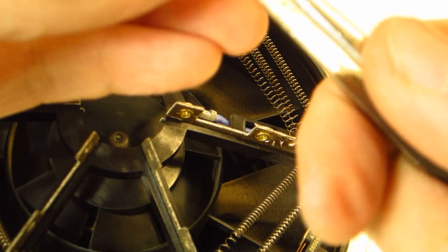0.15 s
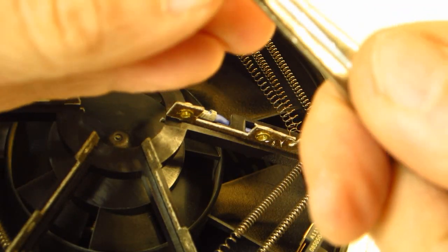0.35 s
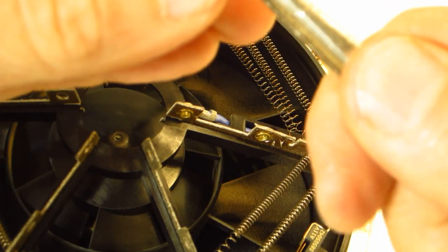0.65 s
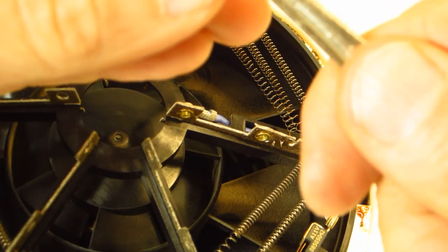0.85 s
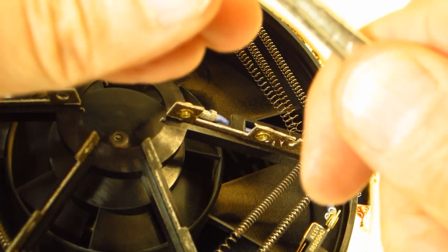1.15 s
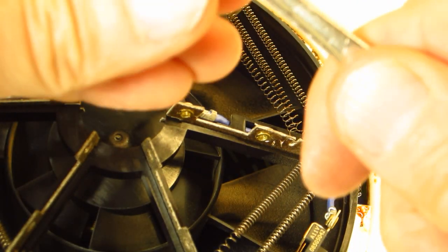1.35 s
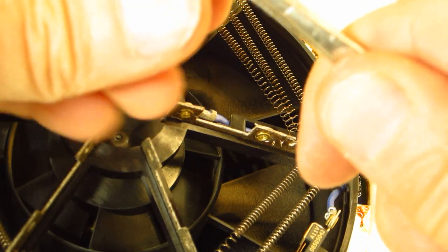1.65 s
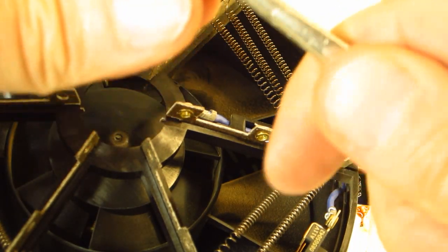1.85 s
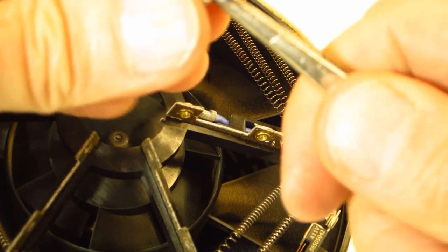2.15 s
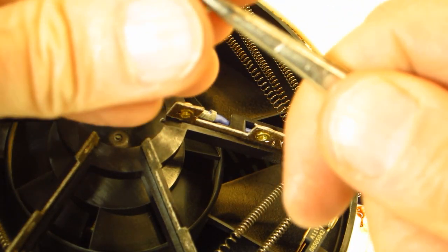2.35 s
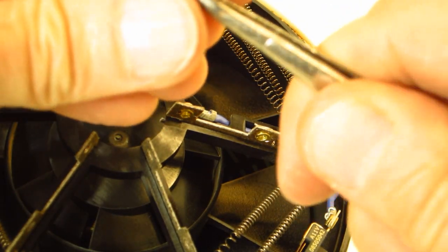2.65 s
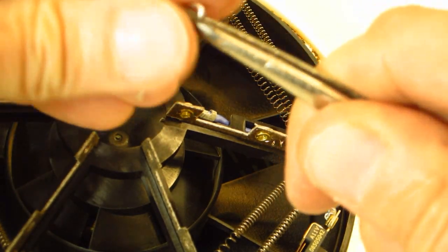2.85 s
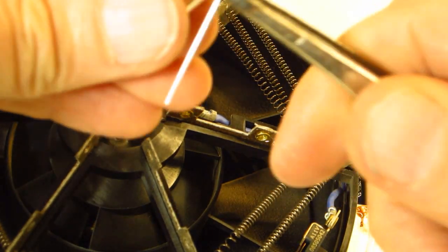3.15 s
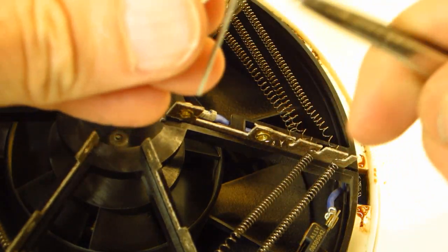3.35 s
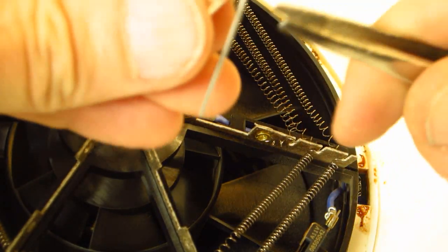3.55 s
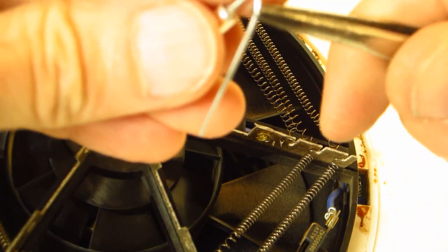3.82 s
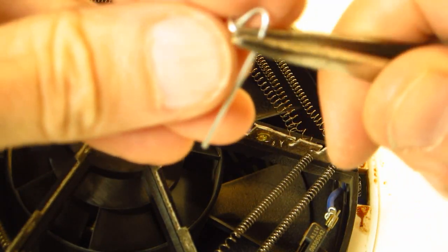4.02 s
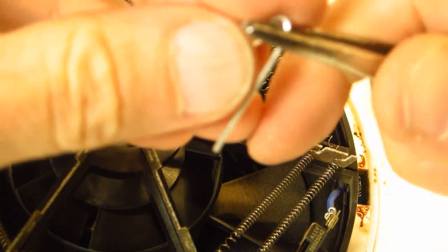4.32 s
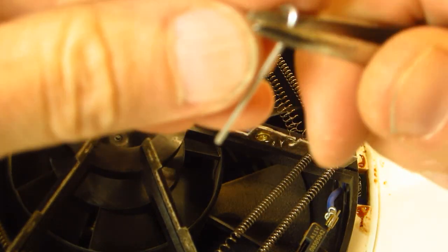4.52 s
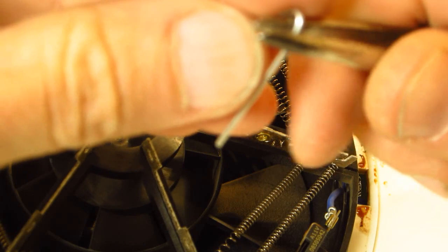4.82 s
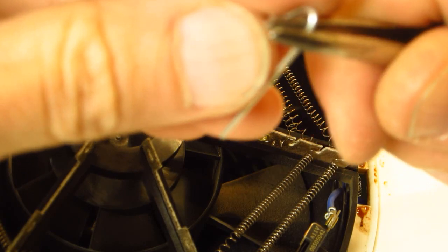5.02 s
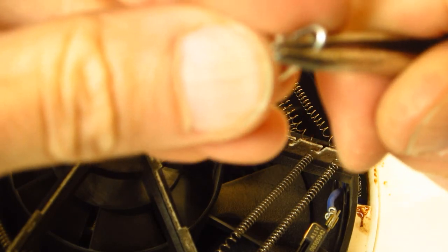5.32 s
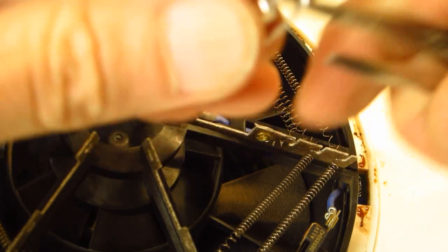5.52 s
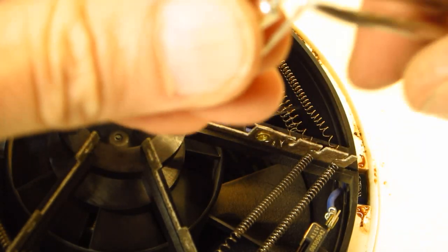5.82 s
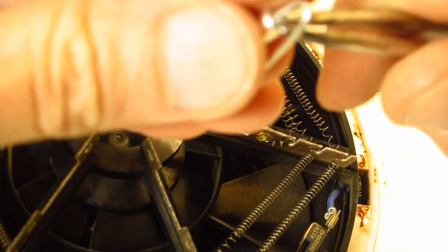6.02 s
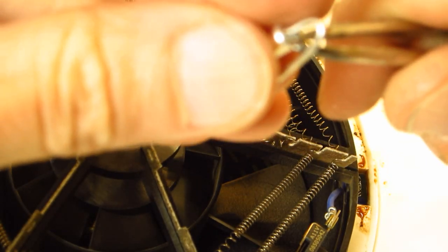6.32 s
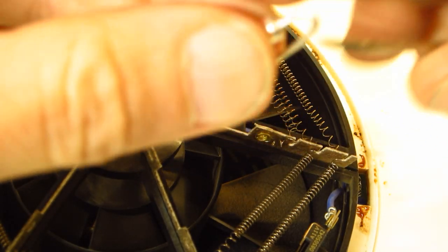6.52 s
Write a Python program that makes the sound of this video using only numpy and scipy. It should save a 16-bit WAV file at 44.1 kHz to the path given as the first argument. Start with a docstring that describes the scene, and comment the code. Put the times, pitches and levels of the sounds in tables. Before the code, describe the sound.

Small pliers click and scrape on a thin metal wire close up, with faint finger rubbing, plastic knocks and soft ticking in a quiet hissy room.

```python
"""Pliers bending a wire

Small pliers grip and bend a wire lead held in the fingers over an open appliance, close to a mono microphone.
The jaws click and scrape: steel and wire ring briefly, damped by the fingers. The hands rub the plastic housing
with coloured noise and knock it with short cracks and notes. Something, probably a clock, ticks softly once a
second as swells of noise. Hiss, hum, rumble and a thin whine fill the quiet room."""
import sys
import numpy as np
from scipy import signal
from scipy.fft import rfft, irfft
from scipy.io import wavfile
from scipy.ndimage import uniform_filter1d

SR = 44100
rng = np.random.default_rng(int(sys.argv[2]) if len(sys.argv) > 2 else 0)


def to_wav(s):
    """Save 16-bit WAV."""
    ch = np.atleast_2d(s).T  # columns
    pcm = np.round(np.clip(ch, -1, 1) * 32767)  # PCM
    wavfile.write(sys.argv[1], SR, pcm.astype(np.int16))


N = 294147
T = np.arange(N) / SR  # time of every sample, s
TOP_HZ = 15900  # nothing is heard above this

# still air of the room and microphone hiss: f/Hz, level/dB
AIR_SPECTRUM = [(44, -43), (75, 0.5), (161, 1.5), (192, -0.5), (252, -1.5), (276, -1.5), (308, -2.5),
                (369, -3.5), (441, -4.5), (676, -7.5), (1300, -9), (3040, -15.5), (3810, -15),
                (13400, -22.5), (16000, -35)]
# fingers shifting their grip: start/s, length/s, housing level/dB, skin hiss level/dB
GRIP_SHIFTS = [(3.097, 0.15, -62.5, -56.5), (3.198, 0.2, -58, -57.5), (3.389, 0.26, -58, -75),
               (3.745, 0.13, -63.5, -72), (4.364, 0.24, -65, -66.5), (5.182, 0.073, -65, -63.5),
               (5.295, 0.04, -77, -62), (5.435, 0.15, -50.5, -57), (6.428, 0.14, -59.5, -63.5)]
# tone of skin rubbing on plastic: f/Hz, level/dB
SKIN_SPECTRUM = [(500, -16), (1500, 1.5), (4000, -1.5), (8000, -3.5), (12000, -16), (16000, -18)]
# ringing modes of the hollow plastic housing: f/Hz, width/Hz, level/dB
HOUSING_MODES = [(461, 53, 6.5), (563, 70, 2.5), (848, 130, -0.5), (1045, 200, -6.5), (1330, 36, 7.5),
                 (2120, 55, 3), (2520, 110, -17), (2980, 100, -1.5), (3480, 180, -3.5), (4520, 65, 2.5),
                 (6850, 380, 3), (7350, 150, -24.5)]
# jaws snapping on the wire: t/s, level/dB, bass/dB and treble/dB (both against the 5 kHz region),
# pitch of the free wire f/Hz, gap to the rebound/s
JAW_CLICKS = [(0.0175, -34.5, -14, -12.5, 6100, 0.00075), (0.32, -55, 12, -22.0, 5640.0, 0.00032),
              (0.3436, -21.5, -9.5, -9.5, 4470, 0.00077), (0.5255, -19.0, -3.5, -9, 4650, 0.00049),
              (1.8786, -31.5, 10.5, -8.5, 2680, 0.00014), (1.9619, -38.5, 7, -3.5, 8000, 0.0007),
              (2.011, -36.0, 5, -17, 6200, 0.00042), (2.343, -50.0, 15, -4, 7460.0, 0.00065),
              (2.8953, -42.5, 10, -5.5, 7460, 0.00059), (2.927, -28.5, 9, -0.5, 4120.0, 0.00086),
              (3.1195, -49.5, 0.0, -1, 8000.0, 0.00043), (3.8585, -28.5, -7.5, -8, 4620, 0.0003),
              (3.8806, -28.0, -0.5, -6.5, 3290.0, 0.00025), (3.9102, -43.0, 10.0, -6.0, 2340, 0.00057),
              (3.9972, -42.0, -3, -3, 3800, 0.00034), (4.0712, -38.5, -3.5, -2, 8050, 0.00043),
              (4.1996, -43.5, -7, -6, 6270.0, 0.00068), (4.216, -43, -1, -2.5, 6100, 0.00068),
              (4.33, -37.0, -8.5, -10, 5300, 0.00046), (4.3405, -43.0, -7, -12.0, 3500, 0.00075),
              (4.371, -47.5, -5, -22.0, 3750, 0.00024), (4.4023, -42.0, -3, -20, 3700, 0.00064),
              (4.4986, -40.5, -3, -6.0, 3720, 0.0007), (5.5099, -44, 4.0, -15, 4050.0, 0.00025),
              (5.5213, -15, -6.0, -2.0, 4190.0, 0.00028), (5.5386, -29.5, 5, 4, 3520.0, 0.00052),
              (5.8838, -42.5, -7, -1.0, 4190.0, 0.00037), (5.912, -47, 15, 0.0, 5260.0, 0.00014),
              (5.9562, -41.5, -4, -1, 7460.0, 0.00034), (5.9936, -34.0, -18, -8, 6840.0, 0.00036),
              (6.4398, -22.5, -4, 3, 8200, 0.00016)]
# partials of the free wire: ratio to its pitch
WIRE_PARTIALS = [1, 1.9, 2.89]
# modes of pliers and wire, damped by the fingers: f/Hz, time to fall 60 dB/s,
# level/dB (before shorter rings are boosted and the contact adds its colour)
STEEL_MODES = [(1220, 0.014, -15.5), (2693, 0.0087, -2), (3117, 0.0079, -2.5), (3840, 0.0033, -1),
               (4510, 0.006, 0.5), (5430, 0.0057, 1), (6270, 0.0037, 2.5), (7060, 0.0096, -0.5),
               (7850, 0.0031, 6), (9390, 0.0043, 1), (10190, 0.0061, 3.5), (11380, 0.0076, 3.5),
               (13200, 0.0037, 4.5), (14800, 0.008, -4)]
# where a contact sets its bass, middle, treble and very top: f/Hz
CONTACT_REGIONS = [2700, 5000, 8700, 13000]
# jaws sliding along the wire: t/s, length/s, level/dB, treble/dB, strongest ring f/Hz
JAW_SCRAPES = [(0.287, 0.0058, -49.5, -10, 5630), (0.304, 0.009, -55, -10, 5240),
               (1.295, 0.043, -59, 1, 2740), (1.961, 0.021, -50.5, -4, 5600),
               (3.234, 0.0083, -41, -4, 5910), (3.213, 0.15, -63, 6, 5860), (3.867, 0.015, -47, -6, 4600),
               (3.999, 0.021, -52, -9, 8470), (4.183, 0.052, -61, 0, 6000), (4.614, 0.0038, -53, -12, 5900),
               (5.542, 0.016, -48, -3, 7600), (5.555, 0.024, -36.5, -1.5, 7830),
               (5.905, 0.032, -47, 0.5, 5900), (6.025, 0.022, -57.5, -6, 5250),
               (6.434, 0.0066, -27, 0.5, 7670), (6.442, 0.014, -45.5, -4, 12500)]
# tone of the distant tick: f/Hz, level/dB
TICK_SPECTRUM = [(400, -12), (850, -3), (1700, -3), (2400, 0), (3300, -2), (4500, -5.5), (6100, -5.5),
                 (7300, -14), (12000, -29)]
# bumps on the housing: t/s, force as level/dB (crack and note are set from it),
# treble tilt/dB per octave, note of the spot that is hit f/Hz
HOUSING_KNOCKS = [(3.173, -47, 8, 1305), (3.380, -49, -4, 1760), (3.476, -54, -4, 556),
                  (3.5416, -24.5, 1.5, 880), (3.5793, -45.5, -3, 1540), (3.6024, -46.5, 0, 656),
                  (3.619, -38.5, 1.5, 3120), (3.675, -55, 3, 820), (5.207, -54, 2, 1980),
                  (6.437, -45.5, -0.5, 1480)]
# tone of the crack of a bump, before its tilt: f/Hz, level/dB
KNOCK_SPECTRUM = [(120, -38), (220, -20), (400, -14), (530, -21), (700, -27), (850, -8), (990, -9),
                  (1150, -5.5), (1450, -16.5), (2400, -10.5), (4200, -16.5), (7400, -18), (9000, -25),
                  (12000, -30), (15000, -53)]
# tone of the faint tail of the room: f/Hz, level/dB
ROOM_SPECTRUM = [(500, -3), (2000, -23), (3500, -3), (5500, 2), (8500, -4), (10500, -6), (15000, -21)]


def undb(db):
    """Turn decibels into a gain."""
    return 10 ** (np.asarray(db) / 20)


def unit(x):
    """Scale a sound to an average (rms) level of 1."""
    return x / np.sqrt(np.mean(x ** 2))


def decay(t, t60):
    """A natural dying-away: down by 60 dB after t60 seconds."""
    return np.exp(-np.log(1000) * t / t60)


def add(out, s, x):
    """Mix a short sound in at time s."""
    i = int(s * SR)
    out[i:i + len(x)] += x[:N - i]


def coloured(points, size, tilt_db=0):
    """Noise of rms 1 shaped by (f/Hz, level/dB) points and tilted by tilt_db per octave."""
    octave = np.log2(np.fft.rfftfreq(size, 1 / SR) + 1)
    hz, db = np.transpose(points)
    shape_db = np.interp(octave, np.log2(hz), db) + tilt_db * octave
    return unit(irfft(rfft(rng.standard_normal(size)) * undb(shape_db), size))


def resonate(x, hz, width):
    """One resonance, with gain 1 at its centre; a narrower one rings longer."""
    return signal.lfilter(*signal.iirpeak(hz, hz / width, fs=SR), x)


def background(hum_hz=40, air_db=-59, hum_db=-64.5, rumble_db=-65.5, whine_hz=7810, whine_db=-82):
    """Steady hiss, a low hum in a bed of rumble and a thin electronic whine made of narrow noise."""
    air = coloured(AIR_SPECTRUM, N)
    hum = np.sqrt(2) * np.sin(2 * np.pi * hum_hz * T)
    rumble = coloured([(8, -48), (25, -4.0), (42, 0.5), (60, -1.5), (100, -15.0), (400, -76.0)], N)
    whine = unit(resonate(rng.standard_normal(N), whine_hz, 45))
    return undb(air_db) * air + undb(hum_db) * hum + undb(rumble_db) * rumble + undb(whine_db) * whine


def housing(x):
    """The plastic shell answers a sound with a sum of its own resonances."""
    return sum(undb(db) * resonate(x, hz, width) for hz, width, db in HOUSING_MODES)


def stroke(start, length, attack_s=0.048, release_t60_s=0.12):
    """A shift of the grip: it builds up, holds and dies away."""
    rise = np.clip((T - start) / attack_s, 0, 1)
    return rise * decay(np.maximum(T - start - length, 0), release_t60_s)


def waver(db, length_s):
    """A gain that wanders by about db, each turn lasting about length_s."""
    wander = uniform_filter1d(rng.standard_normal(N), int(length_s * SR) + 1)
    return undb(db * unit(wander))


def rubbing(grain_db=1.5, grain_s=0.0037, catches_per_s=700, catch_db=5, crackle_db=-3,
            pressure_db=2.5, pressure_s=0.027, hold_db=-71.5):
    """Uneven friction of the fingers hisses, the skin catches in tiny ticks, and both stir the housing."""
    # hands that only hold still are never quite silent
    body_gain = hiss_gain = undb(hold_db)
    for start, length, body_db, hiss_db in GRIP_SHIFTS:
        move = stroke(start, length)
        body_gain = np.hypot(body_gain, undb(body_db) * move)
        hiss_gain = np.hypot(hiss_gain, undb(hiss_db) * move)
    grip = unit(waver(grain_db, grain_s) * waver(pressure_db, pressure_s))
    caught = rng.random(N) < catches_per_s / SR
    catches = caught * undb(catch_db * np.minimum(rng.exponential(size=N), 3))
    ticks = unit(signal.fftconvolve(catches, np.hanning(32))[:N])
    friction = unit(grip + undb(crackle_db) * ticks)
    push = coloured([(300, -16), (450, -5.0), (800, -5.0), (2500, -3.5), (8000, -26)], N)
    body = unit(housing(friction * push))
    hiss = friction * coloured(SKIN_SPECTRUM, N)
    return body * body_gain + hiss * hiss_gain


def steel(low_db, high_db, top_db, pitches, ring_db=7, ring_t60=0.0068,
          contact_s=0.00018, edge_hz=1500, phase_spread=0.32):
    """One slip of energy 1: the contact point weights the steel modes, the free wire stresses some pitches."""
    t = np.arange(1024) / SR
    hz, t60, db = np.transpose(STEEL_MODES)
    colour_db = np.interp(hz, CONTACT_REGIONS, [low_db, 0, high_db, top_db])
    gain = undb(db + colour_db) / np.sqrt(t60)
    # neighbouring modes of a bar swing roughly opposite ways
    phase = np.pi * np.arange(len(hz)) + phase_spread * rng.standard_normal(len(hz))
    modes = np.sin(2 * np.pi * np.outer(t, hz) + phase) * decay(t[:, None], t60)
    soft_start = 1 - np.exp(-(t / contact_s) ** 2)
    x = modes @ gain * soft_start
    ring_width = np.log(1000) / (np.pi * ring_t60)  # Hz
    x = x + undb(ring_db) * sum(resonate(x, pitch, ring_width) for pitch in pitches)
    x = signal.sosfilt(signal.butter(1, edge_hz, "high", fs=SR, output="sos"), x)
    return x / np.sqrt(np.sum(x ** 2))


def contact(db, bass_db, treble_db, pitches, top_slope=1.17, top_growth=0.28, top_offset_db=7, **ring):
    """One slip whose very top follows the treble, but faster, and gains top_growth dB per dB of force."""
    heard = [hz for hz in pitches if hz < TOP_HZ]
    top_db = top_slope * treble_db + top_growth * db + top_offset_db
    return steel(bass_db, treble_db, top_db, heard, **ring)


def clicks(rebound=0.61):
    """Snaps ring the partials of the free wire and bounce once, at rebound times the first strength."""
    out = np.zeros(N)
    span = .003 * SR  # the level counts all the energy as if spread over 3 ms
    for s, db, bass_db, treble_db, pitch, gap in JAW_CLICKS:
        slip = contact(db, bass_db, treble_db, pitch * np.array(WIRE_PARTIALS))
        bounce = np.pad(slip, (round(gap * SR), 0))[:len(slip)]
        snap = slip + rebound * bounce
        add(out, s, undb(db) * snap * np.sqrt(span / np.sum(snap ** 2)))
    return out


def scrapes(slips_per_s=3500, scatter_db=4, bass_db=-7, fade_share=0.29):
    """Sliding jaws stick and slip: a dense run of uneven little clicks that stirs the low modes less."""
    out = np.zeros(N)
    for s, length, db, treble_db, ring_hz in JAW_SCRAPES:
        n = int(length * SR)
        count = int(length * slips_per_s) + 2
        place, side, size = rng.standard_normal((count, 3)).T
        # slips follow each other at uneven gaps
        at = np.clip((np.arange(count) + .5 * place) * n / count, 0, n - 1).astype(int)
        slips = np.bincount(at, undb(scatter_db * size) * np.sign(side), n)
        # the slide speeds up and slows down
        slips = slips * signal.windows.tukey(n, fade_share)
        slip = contact(db, bass_db, treble_db, [ring_hz], ring_db=7.0, ring_t60=0.008)
        x = signal.fftconvolve(slips, slip)
        add(out, s, undb(db) * x * np.sqrt(n / np.sum(x ** 2)))
    return out


def clock(first_s=0.9255, period_s=1, level_db=-47, rise_s=0.014, t60=0.31):
    """Far ticks at an even pace, smeared by the room: noise swells softly up to each tick, then tails off."""
    swell = np.zeros(N)
    for s in np.arange(first_s, T[-1], period_s):
        since = T - s
        swell += np.exp(np.minimum(since / rise_s, -np.log(1000) * since / t60))
    return undb(level_db) * swell * coloured(TICK_SPECTRUM, N)


def knocks(shell_db=-3, crack_db=-1.5, crack_t60_s=0.039, spot_t60_s=.02,
           spot_db=-21, spot_growth=0.57, second_ratio=1.32, second_db=-7):
    """Blows on the housing: a fast-dying crack of dense modes, the note of the spot hit, the shell's ring."""
    out = np.zeros(N)
    t = np.arange(4096) / SR
    for s, db, tilt_db, spot_hz in HOUSING_KNOCKS:
        crack = coloured(KNOCK_SPECTRUM, len(t), tilt_db) * decay(t, crack_t60_s)
        turn = 2 * np.pi * spot_hz * t
        # a curved wall rings with a second mode close above the first
        note = np.sin(turn) + undb(second_db) * np.sin(second_ratio * turn)
        spot = np.sqrt(2) * note * decay(t, spot_t60_s)
        # the note grows less than the force: light bumps ring, hard ones crack
        add(out, s, undb(db + crack_db) * crack + undb(spot_db + spot_growth * db) * spot)
    return out + undb(shell_db) * housing(out)


def space(x, near_db=-13, near_t60=0.023, near_delay=0.0031, room_db=-26, room_t60=0.35):
    """Quick reflections from the hands and the appliance, then the diffuse tail of the room."""
    t = np.arange(2048) / SR
    echoes = rng.standard_normal(len(t)) * decay(t, near_t60) * (t > near_delay)
    near = signal.fftconvolve(x, echoes / np.sqrt(np.sum(echoes ** 2)))[:N]
    # the room stores the energy of each sound and lets it leak away
    keep = np.exp(-2 * np.log(1000) / (room_t60 * SR))
    stored = signal.lfilter([1 - keep], [1, -keep], x ** 2)
    tail = np.sqrt(stored) * coloured(ROOM_SPECTRUM, N)
    return x + undb(near_db) * near + undb(room_db) * tail


def scene():
    """All sources together, the same in both channels."""
    close_hits = space(clicks() + scrapes() + knocks())
    mono = background() + rubbing() + close_hits + clock()
    return np.array([mono, mono])


def record(dry, threshold_db=-17, duck=0.19, release_s=0.29):
    """Gain control dips at peaks above the threshold and creeps back; the top is cut."""
    over_db = np.maximum(20 * np.log10(np.abs(dry[0]) + 1e-9) - threshold_db, 0)
    fade = np.exp(-T / release_s)
    # each peak is remembered and fades until a stronger one takes over
    held_db = np.maximum.accumulate(over_db / fade) * fade
    cut = signal.ellip(8, .2, 70, TOP_HZ, fs=SR, output="sos")
    return signal.sosfilt(cut, dry * undb(-duck * held_db))


dry = scene()
out = record(dry)
to_wav(out)
```